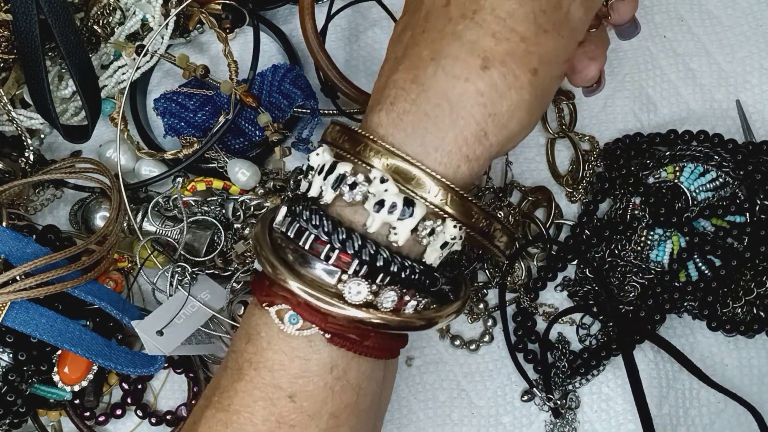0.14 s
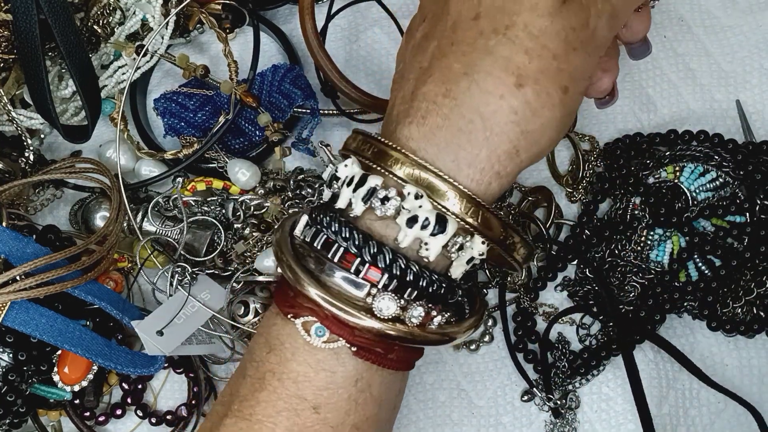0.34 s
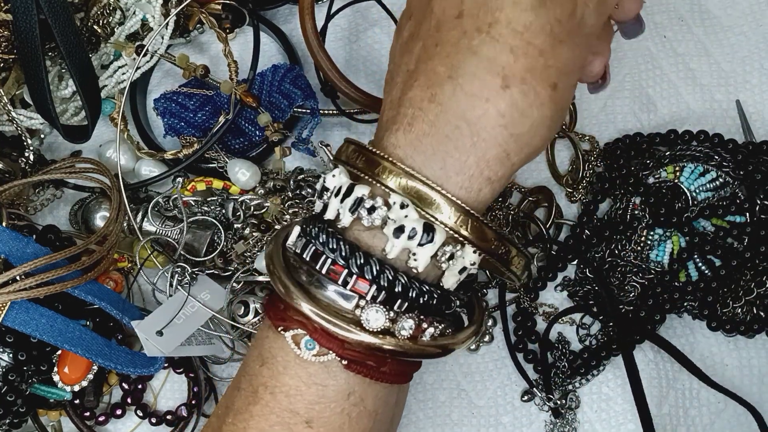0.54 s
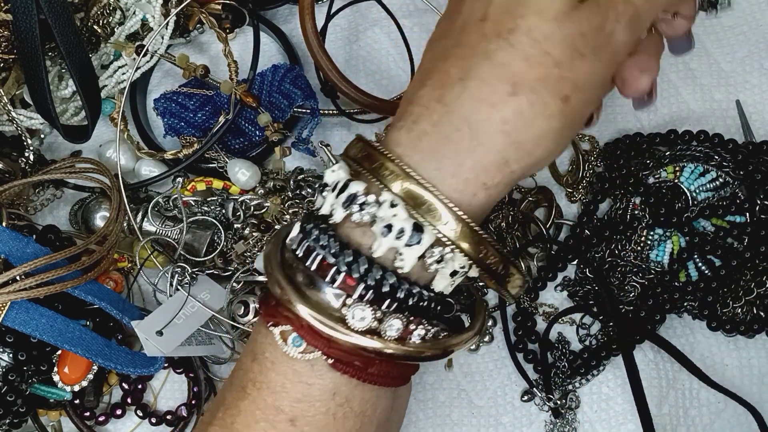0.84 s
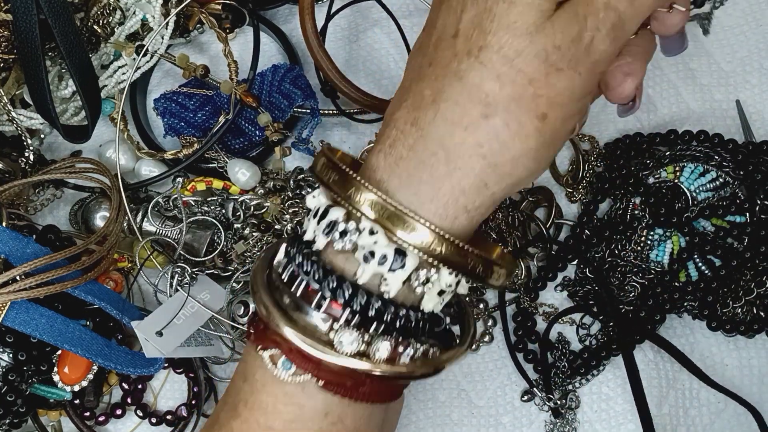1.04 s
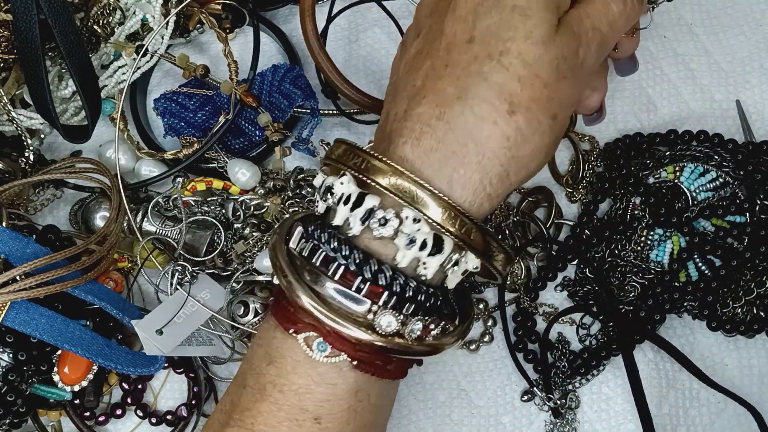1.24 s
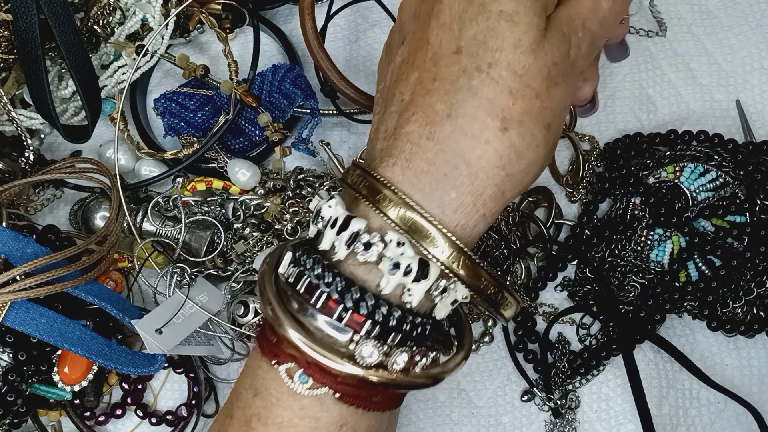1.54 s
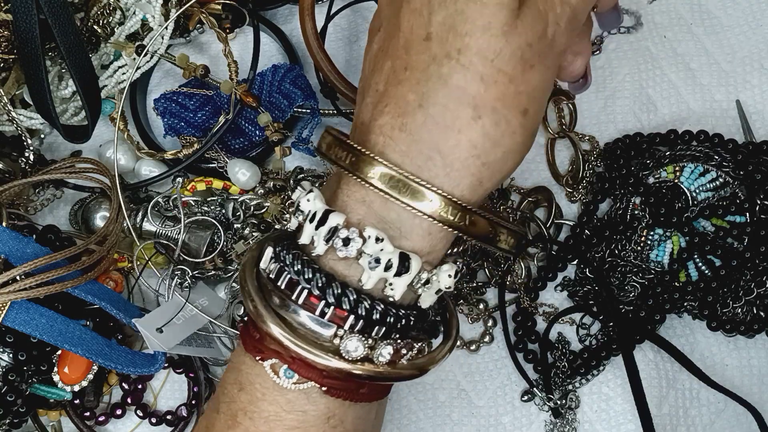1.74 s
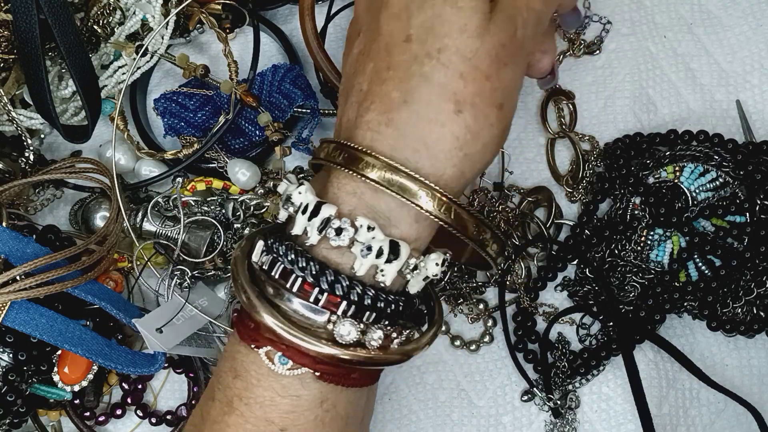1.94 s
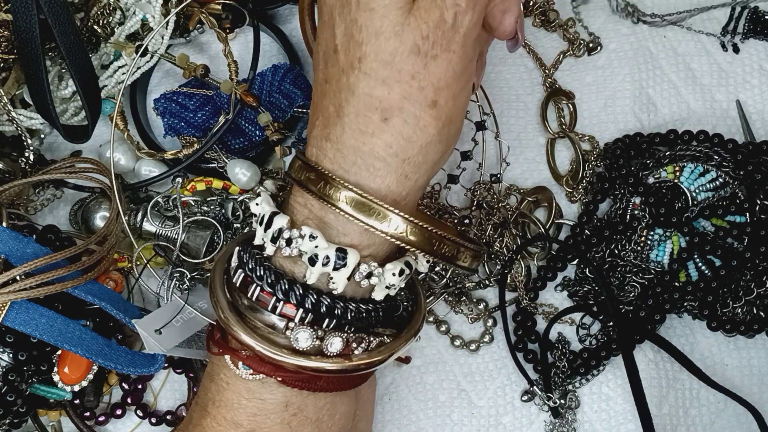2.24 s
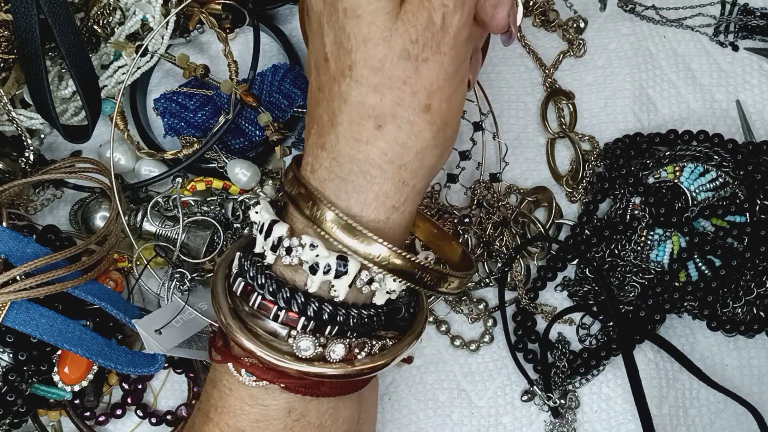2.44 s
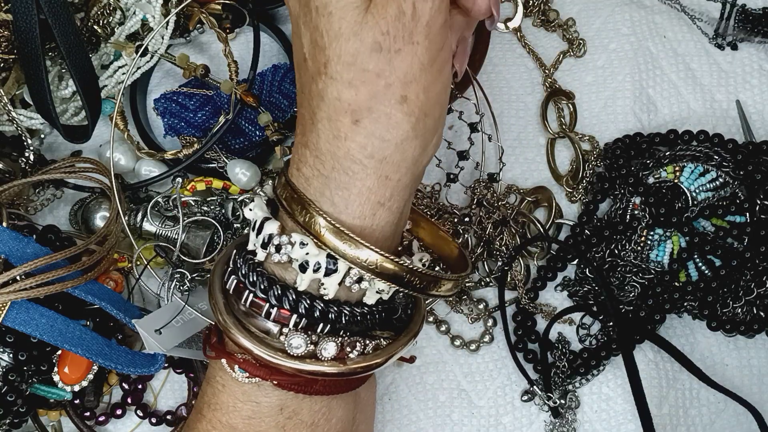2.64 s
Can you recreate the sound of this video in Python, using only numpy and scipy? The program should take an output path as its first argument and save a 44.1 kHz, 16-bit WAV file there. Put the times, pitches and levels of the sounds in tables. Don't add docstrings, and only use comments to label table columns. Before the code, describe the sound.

Light metallic jingling of bracelets and chains being handled, densest in the middle, then a soft bead scrape and a low double knock on the table; close stereo microphones, bassier left, thinner right, low indoor hum.

```python
import sys
import numpy as np
from scipy import signal
from scipy.fft import rfft, irfft
from scipy.io import wavfile
from scipy.ndimage import uniform_filter1d

SR = 44100
rng = np.random.default_rng(int(sys.argv[2]) if len(sys.argv) > 2 else 0)


def transcribe(signal):
    frames = np.atleast_2d(signal).T
    limited = np.clip(frames, -1, 1)
    pcm = np.round(limited * 32767).astype(np.int16)
    wavfile.write(sys.argv[1], SR, pcm)


def ratio_of_db(decibels):
    return 10 ** (np.asarray(decibels, float) / 20)


N = 123479
LEFT_LAG_S = 0.0007

# freq_hz, level_db_per_hz
AIR_SPECTRUM = [(18, -51), (30, -16), (124, -2.5), (355, -13), (1430, -19), (3870, -28.5), (7870, -55),
                (9970, -34), (16000, -48)]
# freq_hz, steady_db, wavering_db, width_hz
HUM_LINES = [(121, -62.5, -65.5, 10), (240.4, -67, -72, 14)]
# freq_hz, likeness_0_to_1
LIKENESS = [(100, 1), (300, 0.53), (1000, 0.19), (4000, 0.086)]
# freq_hz, level_db
LEFT_OVER_RIGHT = [(60, 15), (300, 14), (640, 12.5), (1410, 16.5), (3100, 11), (6820, 1.5), (15000, -9.5)]
# freq_hz, level_db, t60_s
TABLE_MODES = [(126.6, -4.5, 0.18), (175.5, -0.24, 0.16), (212.2, -5, 0.078), (313, -6, 0.058),
               (372, -9.5, 0.065), (490, -15, 0.11), (538, -18, 0.1), (695, -21.5, 0.058),
               (823, -15, 0.072), (1196, -21, 0.054), (1676, -25, 0.11)]
# start_s, level_db, contact_cutoff_hz
KNOCKS = [
    (.782, -42.5, 250),
    (1.516, -51.5, 296),
    (1.84, -50, 296),
    (2.292, -43, 450),
    (2.6188, -27.5, 295),
    (2.6987, -13.5, 637),
    (2.727, -25.5, 865),
]
# time_s, level_db
DRAG_CURVE = [
    (2.2, -86),
    (2.29, -58.5),
    (2.47, -67.5),
    (2.62, -93),
]
# freq_hz, level_db, t60_s
WIDE_MODES = [(2682, 0.5, 0.074), (4275, -0.8, 0.048), (8700, 3, 0.018)]
# start_s, level_db
WIDE_HITS = [
    (.230, -54.5),
    (1.018, -52.5),
    (1.059, -53),
    (1.168, -53.5),
    (1.204, -57),
]
# freq_hz, level_db, t60_s
THIN_MODES = [(3580, -25, .12), (7300, -5.5, 0.06), (11100, -1, 0.055)]
# start_s, level_db
THIN_HITS = [
    (.733, -52),
    (1.304, -46),
]
# freq_hz, level_db, t60_s
HOOP_MODES = [(11680, 2.5, 0.0359)]
# start_s, level_db
HOOP_HITS = [
    (1.235, -53),
    (1.585, -50),
    (1.599, -52),
    (1.608, -41.5),
]
# freq_hz, level_db, t60_s
CUFF_MODES = [(8700, 1.5, 0.043), (11450, 4, 0.053)]
# start_s, level_db
CUFF_HITS = [
    (0.731, -58),
    (1.055, -46),
    (1.2002, -43),
    (1.2027, -39),
    (2.415, -58),
]
# freq_hz, level_db, t60_s
CHARM_MODES = [(12860, 0.5, .045), (14700, -11, .04)]
# start_s, level_db
CHARM_HITS = [(0.92, -50), (1.055, -40), (1.060, -44), (1.171, -36), (1.204, -49), (1.524, -38),
              (1.585, -49), (1.846, -38)]
# freq_hz, level_db, t60_s
PEARL_MODES = [(6040, 0.1, 0.023)]
# start_s, level_db
PEARL_HITS = [(0.736, -54), (1.021, -48), (1.057, -51), (2.415, -36), (2.722, -41), (1.508, -50),
              (1.601, -47), (1.924, -49.5)]
# freq_hz, level_db, t60_s
BEAD_MODES = [(2800, 0.1, 0.024), (3220, -6, 0.018)]
# start_s, level_db
BEAD_HITS = [(0.061, -58), (.775, -51.5), (.797, -53), (1.113, -50), (1.35, -60.5), (2.415, -52)]
# freq_hz, level_db, t60_s
CLASP_MODES = [(8120, 3, .03), (8000, -9.5, 0.073)]
# start_s, level_db
CLASP_HITS = [
    (1.054, -35.5),
    (1.524, -37),
    (1.8405, -31),
    (1.847, -40.5),
    (1.861, -42),
]
# freq_hz, level_db, t60_s
DROP_MODES = [(2530, 0.1, .03)]
# start_s, level_db
DROP_HITS = [
    (0.033, -52.5),
]
# freq_hz, level_db, t60_s
LOCKET_MODES = [(5040, 0.1, 0.028), (9500, 7.9, 0.032)]
# start_s, level_db
LOCKET_HITS = [
    (1.583, -39.5),
    (0.64, -53),
    (0.73, -59),
]
# freq_hz, level_db_per_hz
LINK_SPECTRUM = [(900, -33), (1410, -23), (2730, -20), (5040, -18), (7400, -11.5), (9770, 0.5),
                 (12000, -10), (16000, -19)]
# time_s, level_db
CREEP_CURVE = [(0, -61), (.15, -71), (.42, -68.5), (.5, -72.5), (.72, -69), (1.1, -68.5), (1.4, -66),
               (1.63, -71), (1.76, -74.5), (2.0, -75.5), (2.15, -72.5), (2.35, -71.5), (2.5, -77),
               (2.8, -62)]
# start_s, peak_db, low_link_tilt_db_per_octave
TICKS = [(0.229, -50, 9), (0.2563, -43, -1), (0.3474, -32, -21), (0.395, -39.5, -5), (0.538, -42.5, 6),
         (0.722, -45, 8), (0.7316, -40.5, 4.5), (0.7735, -41, 6), (0.7968, -40.5, 6), (0.9194, -29.5, -3.5),
         (0.9808, -30.5, 1), (1.0196, -43, -8), (1.0527, -21, -4.5), (1.1118, -37, 1), (1.1428, -27, 3),
         (1.1584, -27, 2), (1.2021, -23, 2), (1.2235, -31.5, -7), (1.2333, -32.5, -0.5),
         (1.3029, -30.5, -14), (1.3531, -37.5, -2), (1.478, -33, -7.5), (1.4977, -35.5, 5),
         (1.5824, -21, -4.5), (1.607, -34.5, 3), (1.712, -41, -1), (1.803, -43, -11), (1.8258, -27.5, -15),
         (1.8404, -16, -16), (1.8622, -36.5, 3.5), (1.9235, -39, -5),
         (0.194, -44, -3), (0.8374, -38.5, -7), (1.5076, -33.5, 4), (1.9735, -41, -18),
              (1.9954, -44, -12), (2.0931, -54.5, 10), (2.3267, -38.5, 6.5), (2.414, -30.5, 4.5),
              (2.589, -51, 4), (2.6077, -34.5, 5.5), (2.639, -31, 3.4), (2.7683, -44, 7.5)]
# start_s, peak_db
FLICKS = [(0.0076, -45), (0.032, -41), (0.2376, -47), (0.286, -42), (0.355, -53), (0.405, -46),
          (0.4288, -39), (0.432, -47), (0.8416, -41), (0.8513, -37), (0.8633, -27), (0.8728, -30),
          (0.9279, -45), (0.932, -45), (0.941, -37), (0.986, -31), (0.997, -20), (1.0011, -23),
          (1.007, -23.5), (1.0235, -38), (1.0601, -34), (1.072, -45), (1.1608, -35), (1.165, -29),
          (1.1683, -19.5), (1.1737, -23), (1.182, -30), (1.2155, -35), (1.2517, -41), (1.256, -39),
          (1.2598, -29), (1.265, -50), (1.2815, -41), (1.4507, -40), (1.4583, -43), (1.5134, -29.5),
          (1.5203, -26), (1.5219, -29), (1.617, -36), (1.8324, -30), (1.846, -25), (1.8828, -35),
          (1.911, -36), (1.9461, -43), (2.2797, -54), (2.2898, -40), (2.2959, -45), (2.358, -43),
          (2.4239, -35), (2.6123, -42), (2.6197, -44), (2.623, -39), (2.645, -40), (2.7006, -34),
          (2.7145, -50), (2.7212, -28), (2.7301, -51), (2.7337, -37)]
# peak_s, level_db, rise_ms, fall_ms, low_link_tilt_db_per_octave
JINGLES = [(.265, -42, 51, 23, 3.5), (0.864, -34, 30, 15, -5), (.955, -39, 15, 27, 1),
           (1.0, -25.5, 13, 20, 0.5), (1.17, -22.5, 7.4, 11.3, -2), (1.259, -36.5, 11, 10.5, 1.5),
           (1.46, -38, 11, 22, 0), (1.521, -31, 16, 25, 0.2), (1.848, -32, 4., 16, 0.5),
           (1.912, -38, 4.2, 5.3, 0), (1.034, -39.5, 12, 18, 5), (1.085, -44.5, 12, 22, 4.5),
           (1.152, -38, 4.5, 8, -4), (1.545, -42.5, 15, 19, 0), (1.875, -43, 10, 21, 0),
           (.79, -54, 20, 34, 7.5), (2.621, -44, 7.3, 7.3, 5), (2.29, -45, 28, 25, 3),
           (2.72, -32.5, 4.5, 5.1, 8)]
# freq_hz, level_db, t60_s
LOOSE_MODES = [(4530, -19, 0.035), (6600, 0, .04), (8380, -9, 0.027), (8900, 1, 0.048), (9600, -4, 0.022),
               (10000, -11, 0.016), (11380, 0, 0.046), (12850, -7, 0.04), (13800, -12, .03),
               (15650, -14, .025)]


def rms_one(x):
    return x / np.sqrt(np.mean(x ** 2) + 1e-20)


def in_time(rows):
    return np.interp(np.arange(N) / SR, *np.transpose(rows))


def at_hz(points, hz):
    points_hz, level = np.transpose(points)
    return np.interp(np.log(hz), np.log(points_hz), level)


def butter(x, order, hz, kind):
    return signal.sosfilt(signal.butter(order, hz, kind, fs=SR, output="sos"), x)


def ring(clicks, hz, t60_s):
    radius = ratio_of_db(-60 / (t60_s * SR))
    angle = 2 * np.pi * hz / SR
    poles = [1, -2 * radius * np.cos(angle), radius ** 2]
    return signal.lfilter([0, np.sin(angle)], poles, clicks + 1e-18)


def two_sides(left, right):
    return np.array([np.roll(left, int(LEFT_LAG_S * SR)), right])


def room_air():
    air = np.zeros((2, N))
    edges_hz = 28 * 2 ** np.arange(0, 9.4, 0.5)
    white = rng.standard_normal((2, 3, N))
    for k, (low_hz, high_hz) in enumerate(zip(edges_hz, edges_hz[1:])):
        both, left, right = butter(white[k % 2], 2, [low_hz, high_hz], "band")
        hz = np.sqrt(low_hz * high_hz)
        alike = np.clip(at_hz(LIKENESS, hz), 0, 1)
        shared = np.sqrt(alike) * two_sides(both, both)
        own = np.sqrt(1 - alike) * np.array([left, right])
        air += ratio_of_db(at_hz(AIR_SPECTRUM, hz)) * (shared + own)
    return ratio_of_db(-61) * rms_one(air) + appliance_hum()


def appliance_hum():
    hum = np.zeros(N)
    for hz, steady_db, waver_db, width_hz in HUM_LINES:
        steady = np.sin(2 * np.pi * hz * np.arange(N) / SR)
        waver = ring(rng.standard_normal(N + SR), hz, 2.86 / width_hz)[SR:]
        hum += ratio_of_db(steady_db) * rms_one(steady) + ratio_of_db(waver_db) * rms_one(waver)
    return two_sides(hum, hum)


def room_echoes(x):
    t = np.arange(SR // 4) / SR
    t60_s = 0.16
    echoes = rng.standard_normal((2, len(t))) * ratio_of_db(-60 * t / t60_s) * (t > 0.001)
    echoes /= np.sqrt(np.sum(echoes ** 2, axis=1, keepdims=True))
    return signal.fftconvolve(x, echoes, axes=1)[:, :N]


def table_knocks():
    thud_db, thud_decay_s, thud_cutoff_hz = -3, 0.015, 1160
    push, thud_level = np.zeros(N), np.zeros(N)
    t = np.arange(N) / SR
    for start_s, db, cutoff_hz in KNOCKS:
        click = ratio_of_db(db) * (np.arange(N) == int(start_s * SR)) + 1e-18
        push += butter(click, 2, cutoff_hz, "low")
        decay = np.exp(-np.maximum(t - start_s, 0) / thud_decay_s) * (t >= start_s)
        thud_level += ratio_of_db(db + thud_db) * decay * (cutoff_hz / 1000) ** 2
    wood = sum(ratio_of_db(db) * ring(push, hz, t60_s) for hz, db, t60_s in TABLE_MODES)
    wood += butter(thud_level * rng.standard_normal(N), 4, thud_cutoff_hz, "low")
    wood = butter(wood, 3, 160, "high")
    lagged = np.interp(np.arange(N) - LEFT_LAG_S * SR, np.arange(N), wood)
    wood = np.array([lagged, wood])
    return wood + ratio_of_db(-6.5) * room_echoes(wood)


def bead_drag():
    whine_hz, whine_width_hz = 1440, 65
    white = rng.standard_normal((2, N))
    scrape = rms_one(butter(white, 2, [900, 3300], "band"))
    whine = rms_one(ring(white, whine_hz, 2.9 / whine_width_hz))
    gate = in_time([(2.2, 0), (2.22, 1), (2.6, 1), (2.62, 0)])
    return two_sides(*(ratio_of_db(in_time(DRAG_CURVE) - 2.5) * gate * (scrape + whine)))


def struck_metal(modes, hits):
    start_s, hit_db = np.transpose(hits)
    out = np.zeros((2, N))
    spread_db = rng.normal(0, 1.5, (len(start_s), len(modes), 2))
    for k, (hz, mode_db, t60_s) in enumerate(modes):
        clicks = np.zeros((2, N))
        clicks[:, (start_s * SR).astype(int)] = ratio_of_db(hit_db + mode_db + spread_db[:, k].T)
        out += ring(clicks, hz, t60_s)
    return two_sides(*out)


def link_activity(pitches_hz):
    octaves_below = np.maximum(np.log2(8540 / pitches_hz), 0)[:, None]
    count = len(pitches_hz)
    level, first = np.zeros((count, N + SR)), np.zeros(N, bool)
    ms = np.arange(SR // 8) / SR * 1000
    tick_shape = np.exp(-ms / 2.9) + ratio_of_db(-16) * np.exp(-ms / 22.3)
    flick_shape = np.exp(-ms / 1.55)

    colours_db = rng.normal(0, 5 * np.sqrt(3), (120, count, 1))
    colours_db = uniform_filter1d(colours_db, size=3, axis=1) - 2
    for (start_s, db, tilt_db), own_db in zip(TICKS, colours_db):
        i = int(start_s * SR)
        first[i] = True
        level[:, i:i + len(ms)] += ratio_of_db(db + own_db + tilt_db * octaves_below) * tick_shape
    for (start_s, db), own_db in zip(FLICKS, colours_db[::-1]):
        i = int(start_s * SR)
        first[i] = True
        level[:, i:i + len(ms)] += ratio_of_db(db - 3 + own_db - 0.5 * octaves_below) * flick_shape
    for peak_s, db, rise_ms, fall_ms, tilt_db in JINGLES:
        i = int(peak_s * SR)
        peak = ratio_of_db(db - 2.5 + tilt_db * octaves_below)
        level[:, i:i + len(ms)] += peak * np.exp(-ms / fall_ms)
        level[:, i - len(ms):i] += peak * np.exp(-(ms[::-1] / rise_ms) ** 2)
    return level[:, :N], first


def rattling_links():
    touches_per_s, creeps_per_s, chatter_share = 2300, 3900, 0.087
    first_touch_db, chatter_db, rattle_db, creep_db = 4.5, -14, -12.5, 1.5
    pitches_hz = 1000 + 14800 * np.linspace(0, 1, num=36) ** 1.4
    activity, first = link_activity(pitches_hz)
    sizes = ratio_of_db(5 * np.minimum(rng.exponential(1, N), 3))
    touches = rng.random(N) < touches_per_s / SR
    creeps = rng.random(N) < creeps_per_s / SR

    rattle, creep = np.zeros((2, 2, N)), np.zeros((2, N))
    for hz, level in zip(pitches_hz, activity):
        dealt = rng.random(N) < 0.3
        side_gain = rng.uniform(-0.92, 1, (2, N))
        gain = ratio_of_db(at_hz(LINK_SPECTRUM, hz)) * np.sqrt(hz / 11540)
        t60_s = 62 / hz * rng.uniform(0.51, 1.9)
        clicks = (sizes * touches * dealt + ratio_of_db(first_touch_db) * first) * side_gain * level
        rattle[int(hz > 5500)] += gain * ring(clicks, hz, t60_s)
        creep += gain * ring(sizes * creeps * dealt * side_gain, hz, 0.5 * t60_s)

    bright_activity = activity[20:].mean(axis=0)
    for hz, db, t60_s in LOOSE_MODES:
        caught = touches * (rng.random(N) < chatter_share) + first
        clicks = caught * rng.normal(0, 1, N) * bright_activity * rng.uniform(0.48, 1, (2, N))
        rattle[int(hz > 5500)] += ratio_of_db(db + chatter_db) * ring(clicks, hz, t60_s)

    bright_cut_hz = 4550
    rattle = butter(rattle[0], 2, 900, "high") + butter(rattle[1], 3, bright_cut_hz, "high")
    creep = rms_one(butter(creep, 3, bright_cut_hz, "high"))
    return two_sides(*(ratio_of_db(rattle_db) * rattle + ratio_of_db(in_time(CREEP_CURVE) + creep_db) * creep))


def scene():
    metal = rattling_links()
    for modes, hits in [(WIDE_MODES, WIDE_HITS), (CUFF_MODES, CUFF_HITS), (CHARM_MODES, CHARM_HITS),
                        (THIN_MODES, THIN_HITS), (HOOP_MODES, HOOP_HITS), (PEARL_MODES, PEARL_HITS),
                        (BEAD_MODES, BEAD_HITS), (CLASP_MODES, CLASP_HITS), (DROP_MODES, DROP_HITS),
                        (LOCKET_MODES, LOCKET_HITS)]:
        metal += struck_metal(modes, hits)
    return metal + ratio_of_db(-13) * room_echoes(metal) + table_knocks() + bead_drag() + room_air()


def roll_off(x):
    return signal.sosfilt(signal.butter(12, 16970, fs=SR, output="sos"), x)


def record(dry):
    dry = butter(dry, 2, 34, "high")
    dry = signal.sosfilt(signal.cheby2(10, 30, 16150, fs=SR, output="sos"), dry)
    hz = np.maximum(np.fft.rfftfreq(2048, 1 / SR), 1)
    tilt_db = at_hz(LEFT_OVER_RIGHT, hz)
    left_db = 6 - 10 * np.log10(1 + ratio_of_db(-2 * tilt_db))
    cepstrum = irfft(np.log(ratio_of_db([left_db, left_db - tilt_db])))
    cepstrum[:, 1:1024] *= 2
    cepstrum[:, 1025:] = 0
    colour = irfft(np.exp(rfft(cepstrum)))
    mix = signal.fftconvolve(dry, colour, axes=1)[:, :N]
    return roll_off(mix)


dry = scene()
out = record(dry)
transcribe(out)
```